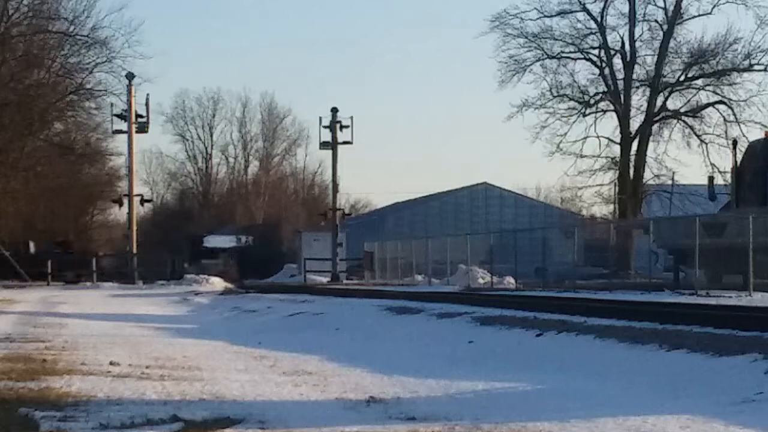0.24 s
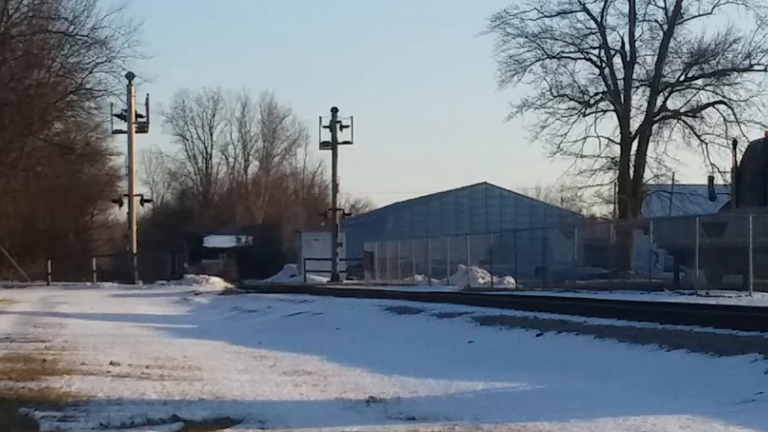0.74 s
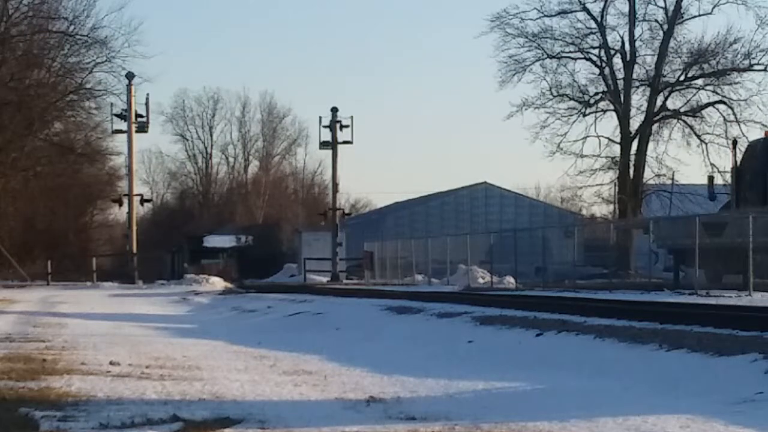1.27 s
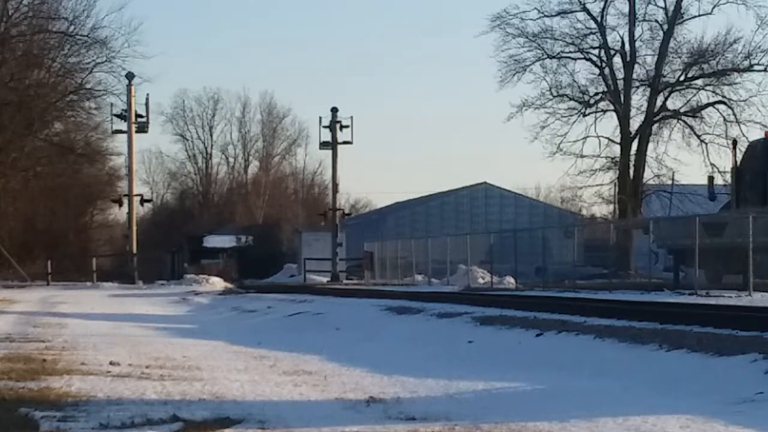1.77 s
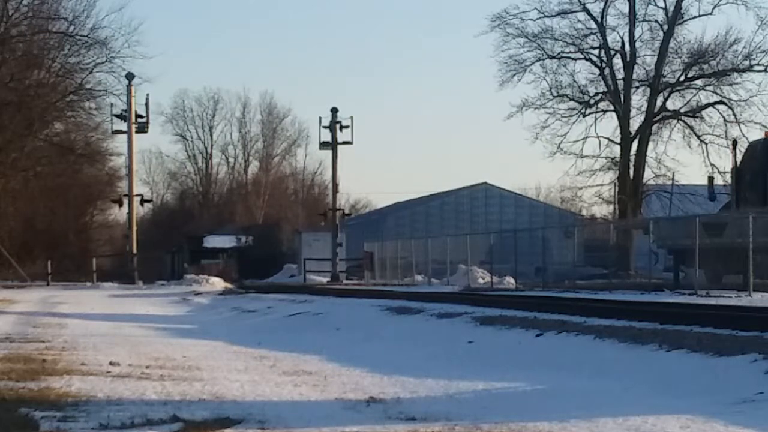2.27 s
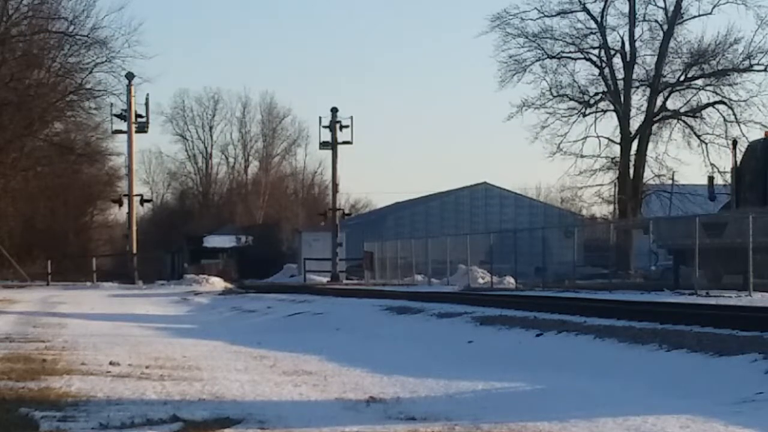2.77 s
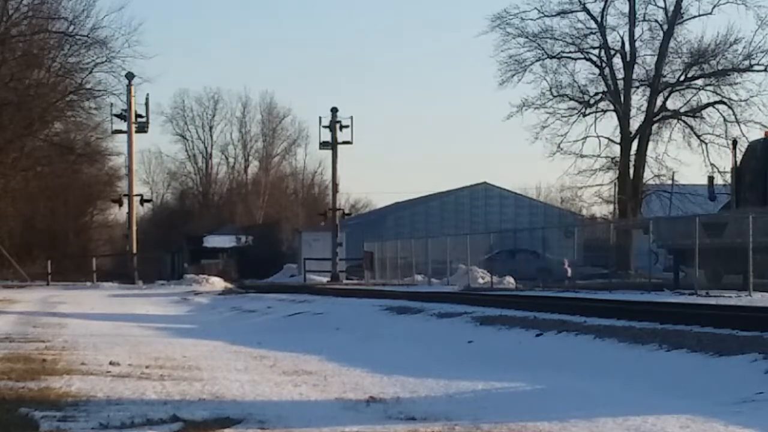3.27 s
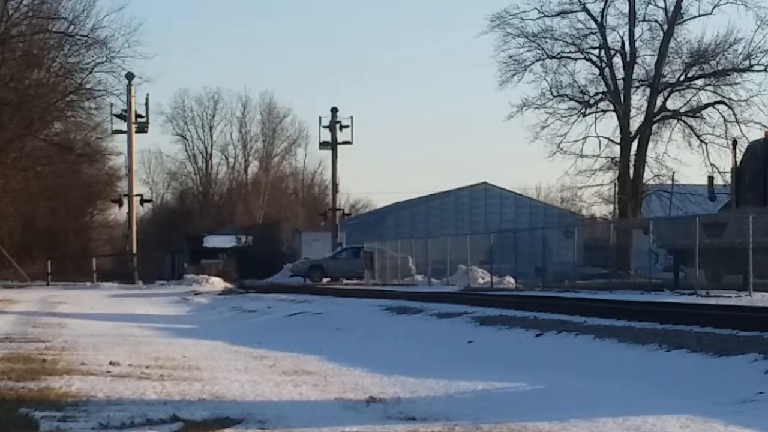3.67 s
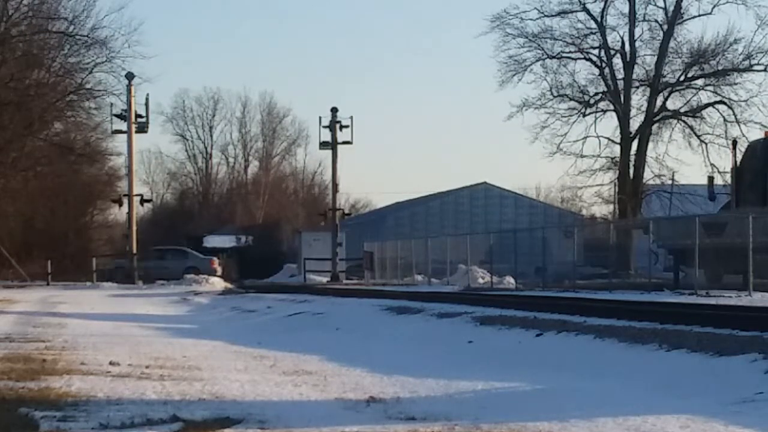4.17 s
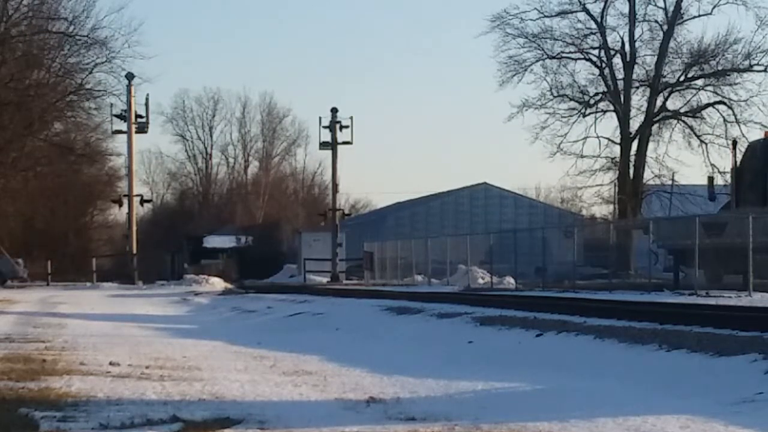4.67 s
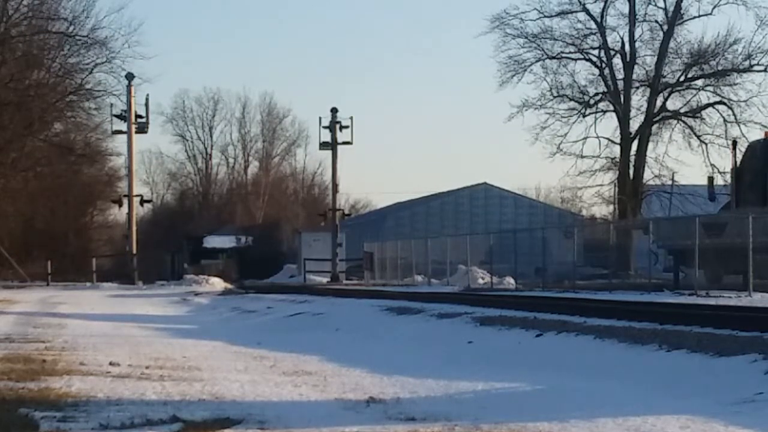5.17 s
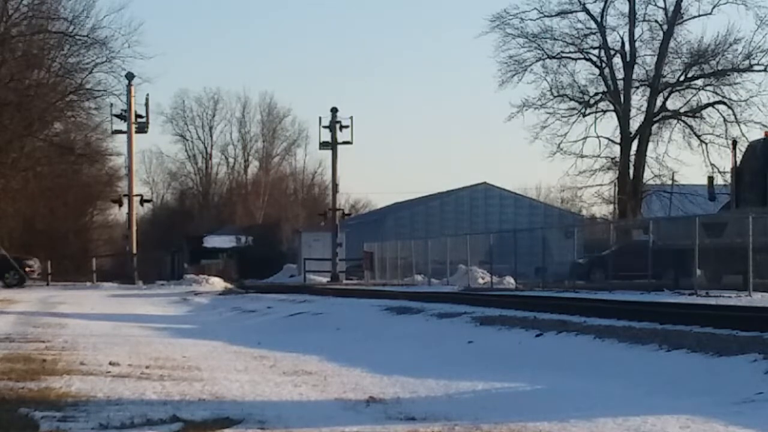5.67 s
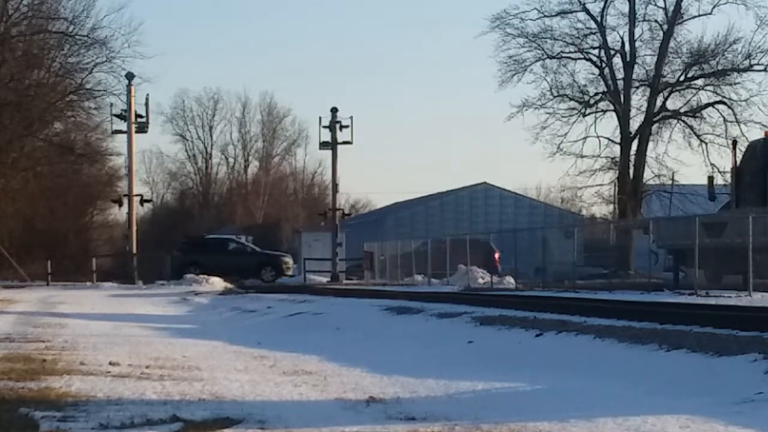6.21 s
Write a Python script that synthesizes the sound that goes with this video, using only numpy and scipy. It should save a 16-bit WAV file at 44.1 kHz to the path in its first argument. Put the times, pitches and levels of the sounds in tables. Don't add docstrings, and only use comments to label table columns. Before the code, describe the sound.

Thin, very high brake squeals over a heavy engine drone, then wind buffeting and cars hissing past on a wet road as the engine pulls away harder.

```python
import sys
import numpy as np
from scipy import signal
from scipy.io import wavfile
from scipy.ndimage import uniform_filter1d

SR = 44100
rng = np.random.default_rng(int(sys.argv[2]) if len(sys.argv) > 2 else 0)


def invert_db(level):
    return 10 ** (np.asarray(level, dtype=float) / 20)


def to_wav(sig):
    pcm = np.clip(np.atleast_2d(sig), -1, 1) * 32767
    pcm = np.round(pcm).astype(np.int16)
    wavfile.write(sys.argv[1], SR, pcm.T)


N = 284123
T = np.arange(N) / SR
FRAMES = np.arange(N // 256 + 5) * 256 / SR
HZ = np.fft.rfftfreq(1024, 1 / SR)[:, None] + 1

# t/s, shaft speed f/Hz, firing tone level/dB, pull/1 (0 coasting, 1 working)
ENGINE = [(0, 32.8, -36, .26), (.2, 31.12, -33, .25), (.45, 32.62, -38, 0), (.85, 32.34, -39.5, .22),
          (1.08, 30.12, -33.5, .2), (1.35, 30.19, -32.5, 0.2), (1.8, 32.53, -32.5, .12),
          (2.12, 32.77, -25.5, 0), (2.45, 33.08, -28.5, 0.02), (2.9, 33.6, -24.5, 0), (3.1, 33.5, -33, 0),
          (3.46, 33.2, -27.5, 0), (3.88, 32.82, -27, .2), (4.12, 32.86, -36.5, 0.38), (4.42, 36.8, -29, .5),
          (4.75, 37.59, -32.5, 0.89), (5.75, 38.1, -31.5, .96), (6.44, 39.9, -33.5, 1)]
# order/1, level/dB
COASTING = [(1, -39), (2, -23), (3, 0), (4, -22), (5, -13), (6, -14.5), (7, -22.5), (8, -25), (9, -24.5),
            (10, -33.5), (11, -28.5), (12, -41), (13, -39)]
# order/1, level/dB
WORKING = [(1, -28), (2, -2), (3, 0), (4, -7), (5, -10), (6, -13), (7, -19), (8, -8.5), (9, -24), (10, -20),
           (11, -22), (12, -25), (13, -23)]
# order/1, level/dB
HALF_ORDERS = [(2.5, -29), (4.5, -20.5), (6.5, -17), (9.5, -23)]
# t/s, depth/dB, half length/s
FADES = [(2.189, 12.5, .04), (3.516, 6, 0.028), (3.647, 10.5, 0.095), (3.992, 20, .03), (4.318, 18, 0.016),
         (4.63, 7, 0.056), (4.907, 4.5, .09), (5.288, 8, .03), (5.43, 11, .03), (5.58, 5, .03),
         (5.71, 6, 0.023), (5.92, 5.5, 0.074)]

# t/s, nearness/dB, wetness/dB, lag between ports/ms, hiss pitch factor/1
CARS = [(0, -5, 2.5, .086, 1), (.3, -4.5, 0.5, .1, 1.05), (.5, -9, 2, .11, 1.08), (.75, -6, 1, .12, 1.01),
        (1.95, -7, -2.5, 0.035, .95), (2.55, -11, -1, .012, 0.99), (3.14, -5.5, 1.5, 0.0067, 1.023),
        (3.36, -6, 0, .006, .99), (3.56, 1.5, -1, .008, 1.04), (3.95, 3.5, .5, .013, 1.01),
        (4.57, 6.5, -3.5, .04, .96), (5.06, 5, -5.5, .08, 0.98), (5.31, 4, 2.5, .11, 0.92),
        (5.42, 1.5, 5.5, .13, 0.91), (5.7, 2.5, 4.5, .16, 1.12), (5.9, 3.5, 1.5, .18, 1.14),
        (6.08, 5.5, -4.5, .22, 1.17), (6.44, 5, -2, .26, 1.08)]
# f/Hz, level/dB per Hz
ROAR = [(150, -31.5), (250, -2.5), (417, -15), (457, -18.5), (826, -11.5), (1340, -12), (2040, -18.5),
        (2760, -40.5), (3360, -40), (4000, -54.5), (5200, -83), (8800, -120)]
# f/Hz, level/dB per Hz
NEAR_ROAR = [(200, -12.5), (300, -4.5), (450, 3), (700, -1.5), (1000, -1.5), (1500, -2.5), (1900, -5.5),
             (2300, -10.5), (3000, -20.5), (4500, -45.5)]
# f/Hz, level/dB per Hz
HISS = [(1500, -23), (2300, -4), (2800, -0.2), (3400, 1.5), (3680, -5), (4500, -11), (5300, -17.5),
        (6500, -37)]
# f/Hz, level/dB per Hz
SPRAY = [(3500, -29), (4600, 3.5), (6000, -0.5), (7200, -0.5), (7700, -4), (8100, -13.5)]
# f/Hz, level/dB per Hz
AIR = [(8500, -28), (11000, 0), (13000, 2), (15500, 1.5), (16000, -3)]
# f/Hz, level/dB per Hz
RUMBLE = [(24, -47), (40, -19), (78, -2.5), (107, 5), (362, -16.5), (439, -19), (700, -40.5), (910, -62.5),
          (1540, -120)]
# f/Hz, level/dB per Hz
BOOM = [(70, -28), (110, -1.5), (170, 2.5), (250, -6.5), (340, -15.5), (500, -43.5)]
# f/Hz, likeness/1
LIKENESS = [(60, 0.83), (150, 1.0), (380, 0.98), (950, 0.96), (2380, 0.98), (5980, 1), (15000, 0.83)]
# t/s, level/dB, rise/s, fall/s
PUDDLES = [
    (0.001, 10, .01, .03),
    (.24, 5, .07, .05),
]
# t/s, level/dB, rise/s, fall/s
PASSED = [
    (.15, -45.5, 1.5, .7),
]
# t/s, level/dB, rise/s, fall/s
FAR = [
    (0.001, -31, .5, 1.5),
    (1.27, -33, 0.95, .9),
    (2.05, -37.5, .9, 0.83),
    (4.55, -37, 2.6, 1),
]
# t/s, level/dB, rise/s, fall/s
AIR_SWELLS = [
    (3.84, -73.5, .12, 0.045),
    (3.98, -68.5, .14, .1),
    (5.7, -79, 0.35, .6),
    (6.05, -75, .7, .8),
]

# t/s, pitch offset f/Hz, level/dB, half length/s
SQUEALS = [(.07, -35, -68, 0.067), (.166, -7, -52.5, 0.075), (.25, 7, -55, .09), (.33, 15.5, -59, 0.11),
           (.395, -20, -56, .07), (.476, 45.5, -56, 0.055), (.57, 24.5, -61, 0.1), (.72, -15.5, -80, .2),
           (.89, -46.5, -60.5, 0.037), (.95, -58.5, -61, 0.046), (1.05, -75, -81, .12),
           (1.21, -12.5, -77, .07), (1.335, 14.5, -60, 0.067), (1.47, 59.5, -84, .15)]
# t/s, pitch offset f/Hz, level/dB, half length/s
LOW_SQUEALS = [
    (.41, -70, -65, 0.036),
    (.47, 0, -64, .06),
    (.53, 85, -66, .07),
    (.61, 25, -68, .08),
    (.7, -40, -81, .12),
]
# t/s, level/dB
CHIRP = [
    (.655, -29),
    (.68, 4),
    (.71, 1.5),
    (.745, -19),
    (.77, -24),
]
# f/Hz, level/dB
CHIRP_TONES = [(6506, -66), (9675, -69.5)]

# t/s, level/dB, f/Hz, t60/s
KNOCKS = [(.092, -36, 2300, .008), (.120, -25, 1400, .014), (.1205, -39, 2400, .006),
          (.221, -40, 3300, .005), (.242, -32, 1900, .022), (.322, -49, 3600, .008),
          (1.9715, -42, 1500, .015), (3.3185, -42, 1500, .015), (5.723, -38, 1500, .015),
          (5.936, -45, 2870, .04), (5.951, -41.5, 3190, .045), (5.953, -43, 2870, .04),
          (5.944, -47, 3450, .04)]
# t/s, level/dB
SPLASH = [
    (5.9, -71),
    (5.935, -55),
    (5.955, -43),
    (5.975, -59),
    (6.02, -72),
]
# f/Hz, width/Hz, level/dB
SLUSH = [(3000, 700, -2), (4100, 900, -3)]
# t/s, level/dB
TICKS = [
    (5.296, -41),
]

# t/s, level/dB, rise/s, fall/s
WIND = [
    (.06, -30, .2, .2),
    (.9, -30, .16, .22),
    (1.32, -29.5, .4, 0.24),
    (2.14, -29, .4, 0.35),
    (3.66, -32.5, .17, .15),
    (4.5, -31.5, .16, .35),
    (5.28, -32.5, .2, .3),
    (5.82, -42.5, 0.12, .15),
    (6.42, -29, .12, .1),
]
# f/Hz, level/dB per Hz
GUSTY = [(15, -40.5), (25, -31), (70, -5), (124, 6), (189, 4), (377, -16), (413, -36.5), (509, -16.5),
         (609, -37.5), (900, -36.5), (1170, -55), (1980, -120)]
# t/s, level/dB, first pitch f/Hz, t60/s
EDDIES = [(.916, -15, 149.8, .05), (.9362, -6.5, 298, 0.024), (.950, -13.5, 119.9, 0.057),
          (1.333, -15.5, 219, 0.036), (1.3425, -4, 135.3, 0.074), (1.3715, -3.5, 325, 0.039),
          (1.3805, -8.5, 200, 0.027), (1.388, -5.5, 170, 0.045), (1.3945, -8.5, 260, 0.045),
          (1.423, -15, 152, .06), (1.647, -20, 188, 0.039), (2.135, -21.5, 89.6, .12),
          (2.19, -28, 65.1, 0.11), (4.505, -24, 120, 0.089), (6.388, -16.5, 119.2, .1)]
# f/Hz, level/dB per Hz
SELF_NOISE = [(2000, -2.5), (7000, -0.5), (12000, 0.5), (16000, 0.5)]


def engine():
    speed_hz, firing_db, pull = columns(ENGINE)
    speed_hz = uniform_filter1d(speed_hz, SR // 4)
    pull = np.clip(pull, 0, 1)
    nearing_db = 1.8 * np.maximum(T - 5.0, 0)
    orders_db = -31 + .3 * (uniform_filter1d(firing_db, SR) + 30.5) - 3.5 * pull + nearing_db
    coarse_t = T[::64]
    dips = sum(db * np.exp(-((coarse_t - s) / half) ** 2) for s, db, half in FADES)
    fade_db = np.interp(T, coarse_t, dips)
    turn = 2 * np.pi * np.cumsum(speed_hz * (1 + .0025 * drift(.03))) / SR
    waver_db = (2.0 + .3 * pull + 2.5 * np.exp(-(T / 1.2) ** 4)) * drift(0.02)
    out = invert_db(firing_db - fade_db + waver_db) * np.cos(3 * turn)
    halves = [((k, db - 15.5), (k, db)) for k, db in HALF_ORDERS]
    for (k, coast_db), (_, work_db) in list(zip(COASTING, WORKING)) + halves:
        db = orders_db + coast_db + pull * (work_db - coast_db) + 1.7 * drift(.08)
        phase = k * turn + .4 * k + .25 * drift(.07)
        out += (k != 3) * invert_db(db) * np.cos(phase)
    return np.sqrt(2) * out


def road():
    near_db, wet_db, lag_ms, hiss_pitch = columns(CARS, FRAMES)
    late_db = columns(CARS, FRAMES - .15)[0]
    late_db = uniform_filter1d(late_db, size=90, mode="nearest")
    close = np.clip(.6 + .3 * np.exp(-FRAMES / .5), 0, 1)
    far_colour = read(ROAR, HZ)
    roar_colour = far_colour + close * (read(NEAR_ROAR, HZ) - far_colour)
    roar = band(swells(PASSED, -44.5 + .3 * late_db, FRAMES), roar_colour)

    water_db = near_db + swells(PUDDLES, 0, FRAMES)
    hiss = band(-61.5 + water_db, read(HISS, HZ / hiss_pitch))
    tilt_db = (2 + .5 * wet_db) * np.log2(HZ / 6000)
    spray = band(-70.6 + water_db + wet_db, read(SPRAY, HZ) + tilt_db)
    air = band(swells(AIR_SWELLS, -86, FRAMES) + 1.5, read(AIR, HZ))
    rumble = band(swells(FAR, -37.5, FRAMES), read(RUMBLE, HZ))
    leaving_db = -33 - 12 * np.maximum(FRAMES - 1.52, 0)
    boom = band(leaving_db, read(BOOM, HZ))

    likeness = read(LIKENESS, np.clip(HZ, LIKENESS[0][0], LIKENESS[-1][0]))
    apart = np.sqrt(np.clip(1 - likeness, 0, 1) / 2)
    apart = apart * np.clip(HZ / 600, .12, 1)
    lead = 0.17 * np.sin(np.pi * HZ * lag_ms / 1000)
    return noise(roar + hiss + spray + air + rumble + boom, 1.0, apart, lead)


def brakes():
    out = np.zeros(N)
    coarse_t = T[::64]
    for rows, pad_hz in (SQUEALS, 12485), (LOW_SQUEALS, 12030):
        hz = pad_hz + columns(rows)[0]
        grabs = [(s, db, half, half) for s, _, db, half in rows]
        db = np.interp(T, coarse_t, swells(grabs, -140, coarse_t, bend=2))
        line = np.cos(2 * np.pi * np.cumsum(hz + 18 * drift(.015)) / SR)
        skirt = evened(resonate(resonate(rng.standard_normal(N), hz, 130), hz, 130))
        out += invert_db(db + .6) * (1.6 * line + 0.55 * skirt)
    on = (T > CHIRP[0][0]) & (T < CHIRP[-1][0])
    for hz, db in CHIRP_TONES:
        level = invert_db(columns(CHIRP)[0] + db + 6 + 2.5 * drift(.004))
        out += on * level * np.cos(2 * np.pi * np.cumsum(hz + 12 * drift(.01)) / SR)
    return out


def crossing():
    on = (T > SPLASH[0][0]) & (T < SPLASH[-1][0])
    drops = rng.standard_normal(N) * invert_db(2.4 * drift(0.0019))
    slush = evened(sum(invert_db(db) * resonate(resonate(drops, hz, w), hz, w) for hz, w, db in SLUSH))
    return rings(KNOCKS, 0.75, 0.015) + on * invert_db(columns(SPLASH)[0] - 3.5) * slush


def ticks():
    out = np.zeros(N)
    for s, db in TICKS:
        out[round(s * SR)] = invert_db(db)
    return out


def wind():
    gust_db = swells(WIND, -35 - 3 * FRAMES, FRAMES)
    pressure = noise(band(gust_db - 4.5, read(GUSTY, HZ)), 2.6, .25)
    lumps = invert_db(3.4 * drift(0.024) - 2.0) * pressure
    lowpass = signal.butter(6, 800, fs=SR, output="sos")
    eddies = signal.sosfilt(lowpass, rings(EDDIES, .3, .2))
    return lumps * invert_db(np.array([[.4], [-.4]])) + eddies * invert_db(np.array([[1.2], [-1.3]]))


def noise(power, patchy_db, apart, lead=0):
    a, b, c, d, patches = rng.standard_normal((len(FRAMES), len(HZ), 5)).T
    patches = evened(uniform_filter1d(uniform_filter1d(patches, 8, 0), 14, 1))
    mid = a + 1j * b
    side = apart * (c + 1j * d) + 1j * lead * mid
    z = np.array([mid + side, mid - side]) * np.sqrt(power) * invert_db(patchy_db * patches)
    out = signal.istft(z, nperseg=1024, noverlap=768)[1][:, :N]
    return evened(out) * np.sqrt(power.sum(0).mean())


def resonate(x, hz, width):
    turn = np.exp(2j * np.pi * np.cumsum(hz * np.ones(len(x))) / SR)
    r = np.exp(-np.pi * width / SR)
    return 2 * (turn * signal.lfilter([1 - r], [1, -r], x / turn)).real


def rings(events, soft_cycles, sag):
    out = np.zeros(N + SR)
    t = np.arange(SR // 8) / SR
    for s, db, hz, t60 in events:
        cycles = hz * t / (1 + sag * np.minimum(hz * t, 2))
        level = invert_db(db - 60 * t / t60) * np.minimum(t * hz / soft_cycles, 1)
        out[round(s * SR):][:len(t)] += np.sin(2 * np.pi * cycles) * level
    return out[:N]


def swells(rows, base_db, t, bend=1):
    power = invert_db(2 * base_db) + 0 * t
    for s, db, rise, fall in rows:
        distance = np.maximum((s - t) / rise, (t - s) / fall)
        power = power + invert_db(2 * (db - 20 * distance ** bend))
    return 10 * np.log10(power)


def band(level_db, colour_db):
    power = invert_db(2 * colour_db)
    return invert_db(2 * level_db) * power / power.sum(0)


def read(points, hz):
    f, value = np.transpose(points)
    return np.interp(np.log(hz), np.log(f), value, left=-150, right=-150)


def columns(rows, t=T):
    s, *values = np.transpose(rows)
    return [np.interp(t, s, v) for v in values]


def drift(seconds):
    span = max(int(seconds * SR / 32), 2)
    coarse = uniform_filter1d(uniform_filter1d(rng.standard_normal(N // 32 + 2), span), span)
    return np.interp(T, np.arange(len(coarse)) * 32 / SR, evened(coarse))


def evened(x):
    return x / np.sqrt(np.mean(x ** 2) + 1e-20)


def scene():
    near = brakes() + crossing() + ticks()
    early = .3 * np.roll(near, 1) * np.array([[1], [-1]])
    return engine() + road() + wind() + near * invert_db(np.array([[.4], [-.4]])) + early


def top_cut(x):
    return signal.sosfilt(signal.butter(12, 15960, fs=SR, output="sos"), x)


def record(dry):
    jolt_s, jolt_db, jolt_length_s = 5.296, -32, 0.038
    jolt = invert_db(jolt_db) * np.exp(-((T - jolt_s) / (jolt_length_s / 3)) ** 2)
    hiss = noise(band(-76.5 + 0 * FRAMES, read(SELF_NOISE, HZ)), .4, 0.32)
    wind_cut = signal.butter(4, 52, "high", fs=SR, output="sos")
    mix = signal.sosfilt(wind_cut, dry) + jolt + hiss
    mix = mix * np.minimum(T / 0.0018, 1)
    return top_cut(mix)


dry = scene()
out = record(dry)
to_wav(out)
```